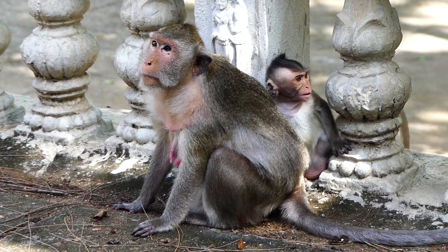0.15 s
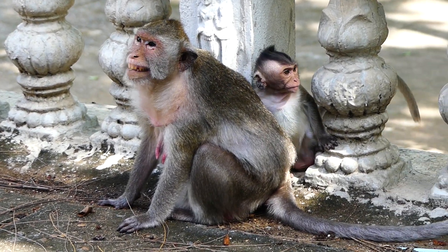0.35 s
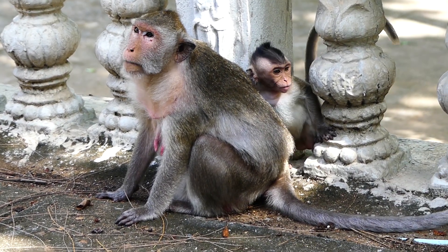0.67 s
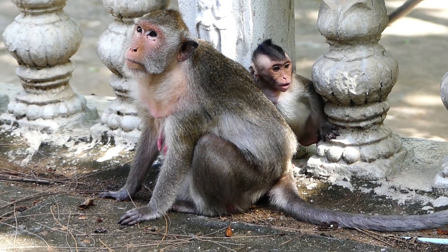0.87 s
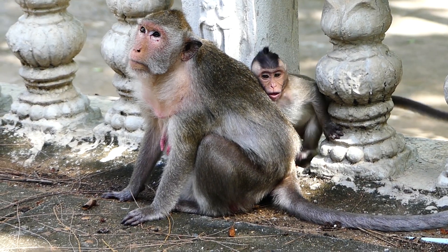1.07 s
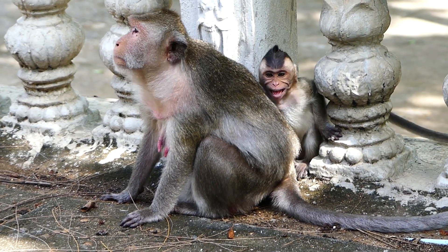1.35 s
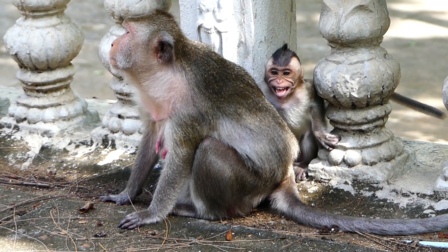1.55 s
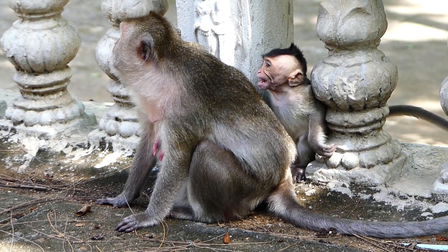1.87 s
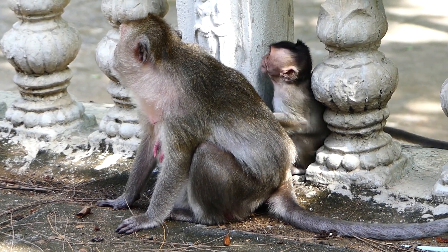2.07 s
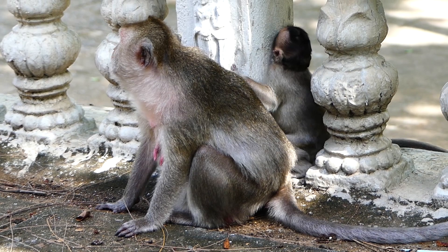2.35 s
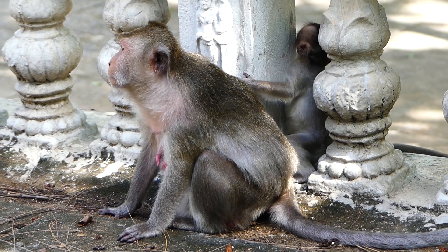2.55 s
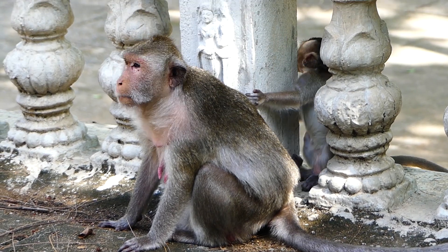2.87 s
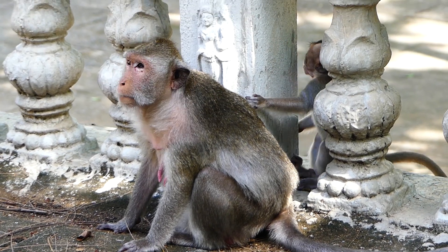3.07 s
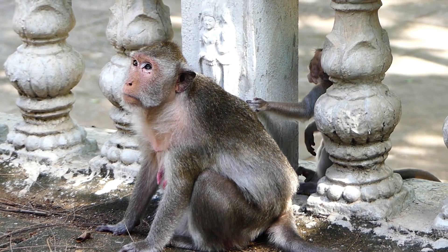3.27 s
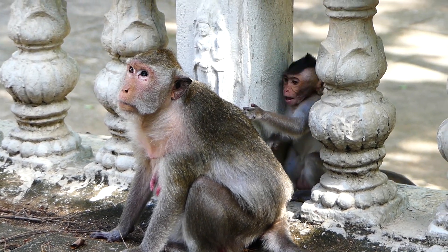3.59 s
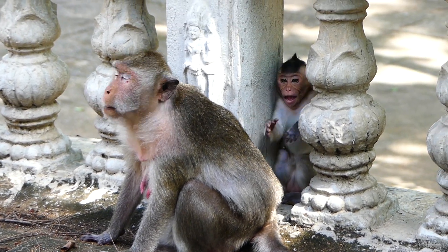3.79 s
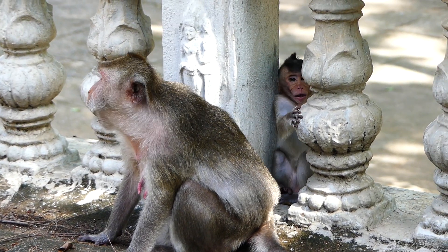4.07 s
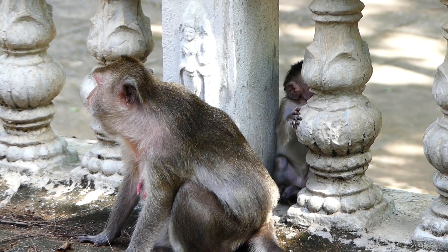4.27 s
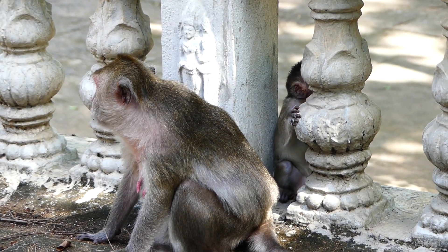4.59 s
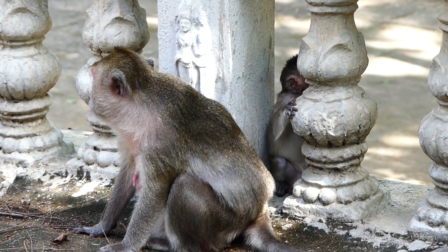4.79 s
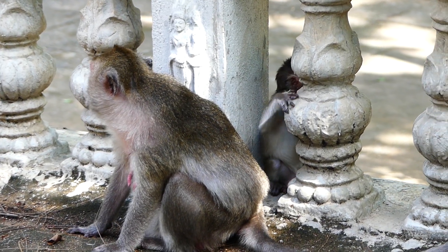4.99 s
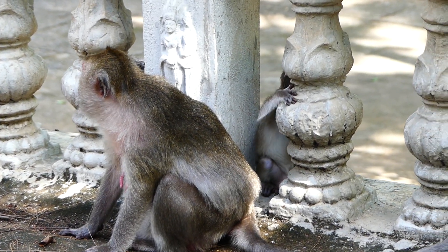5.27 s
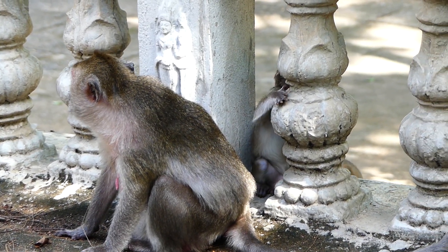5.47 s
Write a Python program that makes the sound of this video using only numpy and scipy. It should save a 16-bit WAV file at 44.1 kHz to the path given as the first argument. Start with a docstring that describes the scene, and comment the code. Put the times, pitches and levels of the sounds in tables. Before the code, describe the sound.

A baby macaque calls in the centre, fairly close, beside a stone balustrade outdoors. A coo breaks into a squeal around one second, then quick falling chirps follow; harsher screams come near three seconds, a short squeal later, then a very high squeal and a last soft coo. Pillars return tight scattered echoes. Low traffic and airy hush stay far behind in wide stereo, with a few tiny rustles.

```python
"""An infant macaque calls from a stone balustrade outdoors: soft coos, some breaking upward into squeals,
and short falling chirps. Each call is a gliding tone with overtones that roughens into rasping noise.
Pillars and paving answer closely with scattered echoes, a ringing gap and a faint tail.
Far behind lie traffic and open air (shaped noise), an engine (one unsteady low tone) and a faint hoot
(a rising tone); swells of flickering noise make several brief rustles and one slow, faint high hiss."""
import sys
import numpy as np
from scipy import signal
from scipy.fft import rfft, irfft, next_fast_len
from scipy.io import wavfile
from scipy.ndimage import uniform_filter1d, map_coordinates

SR = 44100
rng = np.random.default_rng(int(sys.argv[2]) if len(sys.argv) > 2 else 0)


def wav_record(signal):
    """Record a signal, one row per channel, as 16-bit PCM in the file named by sys.argv[1]."""
    frames = np.transpose(np.atleast_2d(signal))
    bounded = np.clip(frames, -1, 1)
    # unit amplitude maps onto the largest positive 16-bit level
    quanta = np.round(bounded * 32767).astype(np.int16)
    wavfile.write(sys.argv[1], SR, quanta)


N = 248724
TIME = np.arange(N) / SR


def amp(db):
    """Decibels to gain."""
    return 10 ** (np.asarray(db) / 20)


def unit(x):
    """Scale to rms 1."""
    return x / np.sqrt(np.mean(x ** 2) + 1e-20)


def along(points, hz):
    """Read (frequency [Hz], value) points on a log frequency axis."""
    f, v = np.transpose(points)
    return np.interp(np.log(hz + 1), np.log(f + 1), v)


def curves(rows, t):
    """Each column after the time, read at the times t."""
    s, *cols = np.transpose(rows)
    return [np.interp(t, np.sort(s), c) for c in cols]


def wobble(rate, t):
    """A smooth random curve, rate knots a second."""
    knots = (t - t[0]) * rate
    return map_coordinates(rng.standard_normal(int(knots[-1]) + 4), [knots])


def filtered(x, response):
    """x shaped by a response given as a function of frequency."""
    size = x.shape[-1]
    padded = next_fast_len(size + 8192)
    spectrum = rfft(x, padded) * response(np.fft.rfftfreq(padded, 1 / SR))
    return irfft(spectrum, padded)[..., :size]


def noise(spectrum, size):
    """Coloured noise of rms 1."""
    return unit(filtered(rng.standard_normal(size), lambda hz: amp(along(spectrum, hz))))


def diffuse(spectrum):
    """Stereo noise of rms 1 that arrives from all around: the two sides are only partly alike."""
    # how alike left and right are: (frequency [Hz], likeness [0-1])
    alike = [(60, 0.36), (130, 0.75), (290, 0.49), (640, 0.59), (1410, 0.63), (3100, 0.72), (6820, 0.79),
             (15000, 0.14)]

    def mid_side_gains(hz):
        turn = np.arccos(np.clip(along(alike, hz), 0, 1)) / 2
        return np.array([np.cos(turn), np.sin(turn)])

    pair = np.array([noise(spectrum, size=N), noise(spectrum, size=N)])
    mid, side = filtered(pair, mid_side_gains)
    return unit(np.array([mid + side, mid - side]))


def background(rumble_db=1.0, air_db=5):
    """Distant traffic rumbles under the soft rush of the open air; both swell together slightly."""
    # colour of the traffic: (frequency [Hz], relative density [dB per Hz])
    rumble_colour = [(20, -50), (33, -22), (50, -22), (70, -10.5), (88, -3.5), (108, -7.5), (130, -3.5),
                     (170, -1), (245, 1.5), (300, -6), (370, -4), (600, -60), (1200, -54)]
    # colour of the open air: (frequency [Hz], relative density [dB per Hz])
    air_colour = [(40, -27), (250, -5), (450, 0.5), (640, 3.5), (860, -3.5), (1200, -1), (1450, -6),
                  (2150, -7), (2750, -10.5), (7000, -18.5), (10000, -21.5), (13500, -25.5), (15800, -33.5)]
    # slow course, before the two trims above: (time [s], rumble level [dB], air level [dB])
    course = [(0, -46, -51.5), (.75, -45.5, -49.5), (2.1, -45, -45.5), (5.2, -43.5, -47),
              (5.64, -42, -48.5)]
    low_db, high_db = curves(course, TIME)
    swell_db = .4 * wobble(5, TIME)
    rumble = amp(rumble_db + low_db + swell_db) * diffuse(rumble_colour)
    air = amp(air_db + high_db + swell_db) * diffuse(air_colour)
    return rumble + air


def engine(firing_hz=106, wander=0.064, throb_db=3):
    """Only the unsteady firing note of a far engine carries this far."""
    # the engine swells and recedes: (time [s], level [dB])
    drone = [(0, -59), (1.2, -52), (3.2, -52), (4.6, -55)]
    pitch = firing_hz * (1 + wander * wobble(25, TIME))
    phase = 2 * np.pi * np.cumsum(pitch) / SR
    throbbing = amp(throb_db * wobble(16, TIME)) * np.sin(phase)
    return amp(curves(drone, TIME)[0]) * unit(throbbing)


def hoot():
    """A soft far tone swells and fades while its pitch rises a little and levels off."""
    # (start [s], length [s], first pitch [Hz], last pitch [Hz], level [dB])
    far_hoot = (3.82, .2, 675, 755, -51)
    start, length, first_hz, last_hz, db = far_hoot
    progress = np.clip((TIME - start) / length, 0, 1)
    pitch = last_hz + (first_hz - last_hz) * (1 - progress) ** 2
    pitch = pitch * (1 + .006 * wobble(60, TIME))
    swell = np.sqrt(2 * np.abs(np.sin(np.pi * progress)))
    return amp(db) * swell * np.sin(2 * np.pi * np.cumsum(pitch) / SR)


def rustles():
    """Swells of flickering noise: several brief rustles, and one slow, faint high hiss."""
    # (time of the peak [s], level [dB], centre [Hz], time from peak to 1/e [s])
    swells = [(0.496, -53, 3930, 0.075), (0.54, -59.5, 9550, 1), (0.898, -44.5, 4830, 0.0047),
              (0.93, -52, 6950, 0.18), (1.924, -44, 5900, 0.031), (2.065, -51.5, 8150, 0.048),
              (4.23, -57.5, 11000, 0.041), (5.08, -55.5, 8600, 0.16), (5.537, -43, 3520, 0.0048)]
    out = np.zeros(N)
    for s, db, hz, length in swells:
        flicker = noise([(hz / 4, -28), (hz, 0), (hz * 2.9, -18)], size=N)
        flicker = flicker * amp(2 * wobble(400, TIME))
        out += amp(db) * unit(flicker) * np.exp(-((TIME - s) / length) ** 2)
    return out


def stonework(x, ring_db=-26, near_db=-9, near_t60=0.078, yard_db=-14, treble_db=3, width=0.44):
    """Nearby pillars scatter a quick cluster of echoes; one gap rings and the yard adds a faint tail."""
    # how long the yard's tail lasts: (frequency [Hz], t60 [s])
    yard = [(500, 0.12), (3000, 0.34), (7000, 0.64), (15000, 0.24)]
    # a gap between the pillars that rings on: (frequency [Hz], t60 [s])
    hollow = (3204, 0.61)
    t = np.arange(SR // 2) / SR
    sparse = rng.standard_normal((2, len(t))) * (rng.random(len(t)) < .025)
    near = sparse * amp(-60 * t / near_t60) * (t > .0005)

    hz, s, z = signal.stft(rng.standard_normal((2, len(t))), SR, nperseg=256)
    decay = amp(-60 * s / along(yard, hz)[:, None])
    tail = signal.istft(z * decay, SR, nperseg=256)[1][:, :len(t)]

    ring_hz, ring_t60 = hollow
    ring = filtered(rng.standard_normal((2, len(t))), lambda f: 1 / (1 + ((f - ring_hz) / 150) ** 4))
    ring = ring * amp(-60 * t / ring_t60)

    answer = amp(near_db) * unit(near) + amp(yard_db) * unit(tail) + amp(ring_db) * unit(ring)
    answer = answer / np.sqrt(len(t))
    # the mouth beams its treble at the stone rather than at the microphones
    answer = filtered(answer, lambda f: amp(along([(6000, 0), (10000, treble_db)], f)))
    mid, side = answer[0], width * answer[1]
    return signal.fftconvolve(x[None], np.array([mid + side, mid - side]), axes=1)


def call(rows, t, slope_db, jitter=0.077, jitter_rate=800, flutter_db=0.1, shimmer_db=4,
         throat_db=-3, teeth_db=1.0, second_fold=.84, split=0.52):
    """One call: a gliding tone from the larynx whose cycles grow uneven and noisy with strain."""
    # the mouth's colour on the overtones: (frequency [Hz], gain [dB])
    mouth = [(2200, 0), (2900, 8.5), (3500, -6.5), (4500, 0), (5400, -0.5), (7000, -11.5), (8300, -8.5),
             (10500, 0), (12000, -8.5), (13500, -0.5), (15800, -21)]
    # overtones at the larynx, before slope and mouth: (multiple of the pitch, strength [dB])
    overtones = [(2, -3.5), (3, -2.5), (4, -11), (5, -5), (6, -6.5), (7, -6.5), (8, -5.5), (9, -13)]
    # turbulence in the throat: (frequency [Hz], relative density [dB per Hz])
    throat_rasp = [(900, -52), (2000, -9), (3000, 3), (4200, -3.5), (5500, 5), (7000, 2.5), (8000, -7),
                   (15000, -80)]
    # turbulence at the teeth: (frequency [Hz], relative density [dB per Hz])
    teeth_rasp = [(2500, -54), (5000, -4.5), (7000, 1.5), (8200, -7), (10500, 3), (14000, 1.5), (16000, -2)]
    # resonances that the rasp whistles in: (centre [Hz], width [Hz], summed boost [dB])
    rasp_peaks = [(2650, 360, -4.5), (3810, 190, 16.5), (4260, 360, 11.5), (7000, 91, 4), (8620, 160, 9.5),
                  (10050, 420, 7), (12000, 300, 6), (14400, 450, 0)]
    # the folds beat at half rate at the top of the loudest scream: (peak [s], time to 1/e [s])
    doubling = (3.273, .018)

    pitch, level_db, overtones_db, rough = curves(rows, t)
    rough = np.clip(rough, 0, .98)
    pitch = uniform_filter1d(pitch, size=160) * (1 + 0.0046 * wobble(89.0, t))

    # uneven cycles smear each line, the high overtones most
    uneven = 1 + jitter * rough ** 1.43 * wobble(jitter_rate, t)
    phase = 2 * np.pi * np.cumsum(pitch * uneven) / SR
    upper = np.zeros(len(t))
    for k, (_, db) in enumerate(overtones, 2):
        strength = amp(db + slope_db * np.log2(k / 2) + along(mouth, k * pitch))
        upper += strength * (k * pitch < SR / 2) * np.sin(k * phase)

    # half-rate beating adds lines at half and one and a half times the pitch, -13 dB each
    half_s, half_length = doubling
    halves = amp(-13) * np.exp(-((t - half_s) / half_length) ** 2)
    halves = halves * (np.sin(phase / 2) + np.sin(phase + phase / 2))

    # under strain the two folds fall out of step and the line splits
    drift = 2 * np.pi * np.cumsum(pitch * jitter * rough * wobble(jitter_rate, t)) / SR
    second = split * rough * np.sin(second_fold * phase + drift)
    tone = np.sqrt(2) * (np.sin(phase) + second + halves + amp(overtones_db) * upper)

    # air escapes in puffs, once a cycle; a bared mouth adds hiss
    rasp = amp(throat_db) * noise(throat_rasp, size=len(t))
    rasp += amp(teeth_db + overtones_db) * noise(teeth_rasp, size=len(t))
    rasp *= 1 + 0.45 * np.sin(phase)

    def whistle(hz):
        return amp(sum(db / (1 + (2 * (hz - c) / w) ** 2) for c, w, db in rasp_peaks) - 2)

    rasp = filtered(rasp, whistle)
    tremble = amp(flutter_db * wobble(128.8, t) + shimmer_db * rough * wobble(600, t) / 2)
    gate = np.clip(np.minimum(t - t[0], t[-1] - t) / 0.0015, 0, 1)  # 1.5 ms fades
    return gate * amp(level_db) * tremble * (np.sqrt(1 - rough ** 2) * tone + rough * rasp)


def voiced(rows, slope_db, echo_db, ring_db=-30):
    """One call as it reaches the microphones, straight and by way of the stone."""
    sounding = (TIME >= rows[0][0]) & (TIME <= rows[-1][0])
    voice = call(rows, TIME[sounding], slope_db)
    # the infant moves about, so each call meets new echoes
    heard = amp(echo_db) * stonework(voice, ring_db)
    heard[:, :len(voice)] += voice
    return np.pad(heard, ((0, 0), (np.argmax(sounding), N)))[:, :N]


def coo(curve):
    """A coo keeps a nearly clean tone throughout: low, constant roughness."""
    roughness = 0.073  # 0-1
    return [(*point, roughness) for point in curve]


def chirp(start, hold, fall, first_hz, turn_hz, last_hz, held_db, falling_db,
          held_overtones_db, last_overtones_db, held_rough):
    """A short note is held, then its pitch drops while level, overtones and roughness shift."""
    peak_at, fade_at, fade_db = 0.25, 0.54, 3  # shares of the fall; depth of the fade [dB]
    fall_ease = 1.5  # the pitch drops fast at first, then eases out
    fall_rough = 0.2  # roughness during the fall, 0-1
    t = np.linspace(start, start + hold + fall, 64)
    held = np.clip((t - start) / hold, 0, 1)
    fallen = np.clip((t - start - hold) / fall, 0, 1)
    dropped = 1 - (1 - fallen) ** fall_ease
    pitch = (first_hz + (turn_hz - first_hz) * held) * (last_hz / turn_hz) ** dropped
    loosened = np.clip(fallen / peak_at, 0, 1)
    fade = np.interp(fallen, [fade_at, 1], [0, 1])
    level_db = (1 - loosened) * held_db + loosened * falling_db - fade_db * fade
    overtones_db = held_overtones_db + (last_overtones_db - held_overtones_db) * dropped
    rough = held_rough + (fall_rough - held_rough) * loosened
    return np.transpose([t, pitch, level_db, overtones_db, rough])


def squeal(arch, crest_overtones_db, db_per_octave, closing_db, peak_rough, rasp_at, rasp_spread):
    """A squeal arches in pitch, its overtones follow pitch and mouth, and strain swells into a rasp."""
    # the voice cracks, the level jumps for an instant: (time [s], jump in level [dB])
    cracks = [(1.238, 12.5), (3.747, -2), (4.409, 6), (4.428, 18.5), (4.572, 14.5)]
    # the rasp clears as the pitch sinks and the folds slacken: (pitch [Hz], share of roughness left)
    slackening = [(2000, 0.87), (3600, 1)]
    clean_rough = .13  # roughness away from the rasp, before slackening, 0-1
    crack_s = 0.0018  # from the peak of a crack to 1/e of its decibels
    crack_purity = .8  # share of a jump that goes into the bare tone alone, 0-1
    progress = np.linspace(0, 1, 384)
    t = arch[0][0] + progress * (arch[-1][0] - arch[0][0])
    pitch, level_db = curves(arch, t)
    below_crest = np.log2(pitch / pitch.max())  # octaves, negative
    overtones_db = crest_overtones_db + db_per_octave * below_crest - closing_db * progress
    strain = np.exp(-((progress - rasp_at) / rasp_spread) ** 2)
    rough = clean_rough + (peak_rough - clean_rough) * strain
    rough = rough * along(slackening, pitch)
    crack_db = sum(db * np.exp(-((t - s) / crack_s) ** 2) for s, db in cracks)
    pure_db = crack_purity * crack_db
    return np.transpose([t, pitch, level_db + crack_db, overtones_db - pure_db, rough * amp(-pure_db)])


def infant():
    """Coos, chirps and squeals, all from the same tiny larynx."""
    # soft coos, one curve each: (time [s], pitch [Hz], level [dB], overtones [dB])
    coo_curves = [
        [(.83, 1322, -58, -10), (.857, 1547, -35, -19.5), (.885, 1435, -40, -11), (.925, 1104, -46, -9),
         (1.01, 1081, -42, -16), (1.035, 1198, -38, -9), (1.075, 1490, -37, -9), (1.10, 1484, -31, -13.5),
         (1.125, 1764, -34.5, -26)],
        [(4.235, 1195, -52, -20), (4.29, 1235, -49.5, -8), (4.35, 1480, -57, 3.5), (4.37, 1550, -40, -13),
         (4.398, 1740, -34.5, -6)],
        [(5.41, 1067, -52, -12), (5.46, 1110, -43, -6), (5.55, 1126, -39.5, -6), (5.64, 1157, -46, 7)],
    ]
    # how each coo is aimed: (overtone slope [dB per octave], echo trim [dB])
    coo_aim = [(0.5, 4.5), (-1, 6), (-35, -11)]
    # short falling chirps: (start [s], hold [s], fall [s], first pitch [Hz], pitch at the turn [Hz],
    # last pitch [Hz], held level [dB], falling level [dB], held overtones [dB], last overtones [dB],
    # held roughness [0-1], overtone slope [dB per octave], echo trim [dB])
    chirp_shapes = [ (1.508, 0.0034, .013, 4960, 4940, 3920, -48, -47, 8, 13, 0.14, 6, 8),
                    (1.52, 0.02, .047, 3910, 3950, 1753, -44, -33, 11, -16.5, 0.3, 3.5, 3),
                    (1.605, 0.014, 0.013, 1583, 1507, 1500, -43, -45, -12, -4, 0.23, -10, 2),
                    (1.864, .012, .023, 3810, 3800, 1630, -44, -30.5, 10, -19, 0.17, 4, 2),
                    (1.897, 0.0033, 0.0136, 3250, 3150, 2440, -37, -31.5, -15, -15, 0, 0, -1),
                    (2.274, 0.031, .016, 4650, 4310, 3710, -45, -34.5, -3, -9, 0.33, 12, 5.5),
                    (2.32, .003, .016, 2770, 2474, 1440, -33, -27.5, -22, -36, 0.37, 2, -0.5),
                    (2.544, .032, .022, 2580, 2700, 1630, -34, -30, -11, -10, 0.79, -5, 0)]
    # arching squeals and screams, one curve each: (time [s], pitch [Hz], level before cracks [dB])
    arches = [
        [(1.125, 1810, -45), (1.136, 2970, -27), (1.145, 4285, -38), (1.16, 4190, -35), (1.171, 2620, -22)],
        [(1.171, 2667, -29), (1.186, 5890, -35), (1.203, 7030, -39.5), (1.221, 7120, -34), (1.236, 5450, -28),
         (1.249, 4015, -25.5), (1.26, 3320, -29.5), (1.267, 3800, -24), (1.277, 2380, -27)],
        [(2.955, 3885, -48), (2.966, 4784, -37.5), (2.99, 4695, -39.5), (3.012, 4097, -37.5),
         (3.036, 3900, -36.5), (3.042, 2840, -28), (3.053, 2074, -26), (3.066, 1780, -39)],
        [(3.152, 1690, -36), (3.17, 2090, -35.5), (3.19, 3550, -40), (3.219, 5624, -29), (3.238, 6785, -31),
         (3.265, 7105, -22), (3.281, 6570, -32), (3.305, 4410, -26), (3.345, 3610, -24.5), (3.379, 2940, -26.5),
         (3.391, 2000, -25)],
        [(3.732, 3210, -58), (3.748, 3450, -38.5), (3.764, 4366, -40.5), (3.79, 4160, -32),
         (3.807, 2792, -28.5), (3.831, 2810, -33), (3.842, 1870, -29)],
        [(4.398, 1783, -32), (4.42, 3400, -46), (4.44, 5910, -41.5), (4.47, 7860, -53), (4.495, 8680, -49),
         (4.55, 9050, -43.5), (4.574, 7650, -40), (4.598, 6650, -37), (4.635, 2858, -26), (4.654, 2426, -26),
         (4.68, 1600, -43)],
    ]
    # the voice in each squeal, in the same order: (overtones at the crest [dB],
    # their loss below the crest [dB per octave of pitch],
    # their loss as the mouth closes [dB], negative as it opens,
    # peak roughness before slackening and cracks [0-1],
    # peak of the rasp [share of the squeal], its spread [share of the squeal],
    # overtone slope [dB per octave], echo trim [dB], ring of the gap before the echo trim [dB])
    squeal_voices = [ (-14, -1, 0, 0.41, 0.81, 0.33, -8, 1, -44),
                     (-16, 2, 1, 0.55, 0.88, 0.25, -9, -1.5, -45),
                     (10.5, 3.5, 16, 0.87, .55, 0.325, -1.5, 8.5, -32),
                     (8, 6, 9.5, 0.813, .8, 0.218, -1.5, 3, -27.5),
                     (17, 9.5, 14.5, .2, 0.56, 0.58, 0, 1.5, -37),
                     (-0.5, 9.5, -5.5, .72, .72, 0.39, 1, 9.5, -21.5)]

    out = np.zeros((2, N))
    for curve, (slope_db, echo_db) in zip(coo_curves, coo_aim):
        out += voiced(coo(curve), slope_db, echo_db)
    for *shape, slope_db, echo_db in chirp_shapes:
        out += voiced(chirp(*shape), slope_db, echo_db)
    for arch, (*tone, slope_db, echo_db, ring_db) in zip(arches, squeal_voices):
        out += voiced(squeal(arch, *tone), slope_db, echo_db, ring_db)
    return out


def scene():
    """The infant sits straight ahead among the pillars, before the distant background."""
    distance = background() + engine() + hoot()
    swells = rustles()
    return distance + swells + stonework(swells)[:, :N] + infant()


def record(dry):
    """The microphones pass nothing above their band limit."""
    top_hz = 15850
    return filtered(dry, lambda hz: hz < top_hz)


dry = scene()
out = record(dry)
wav_record(out)
```